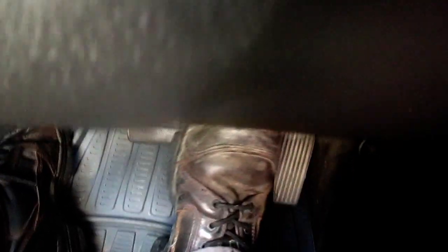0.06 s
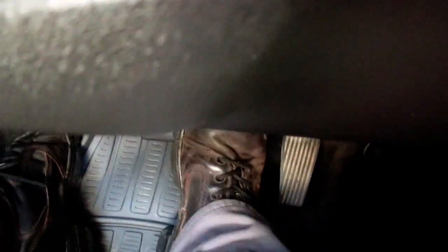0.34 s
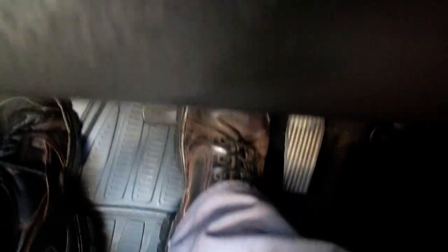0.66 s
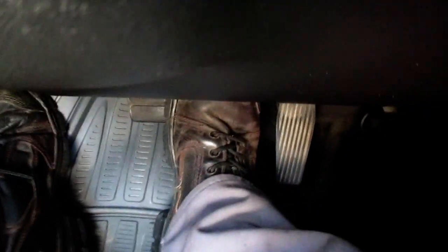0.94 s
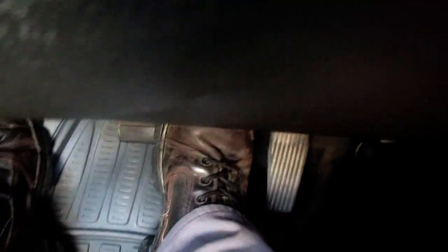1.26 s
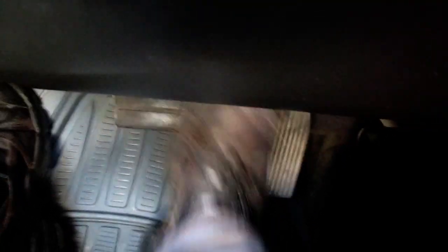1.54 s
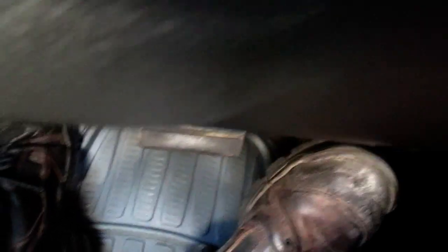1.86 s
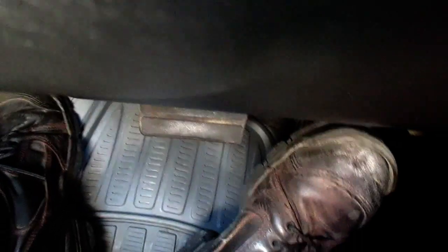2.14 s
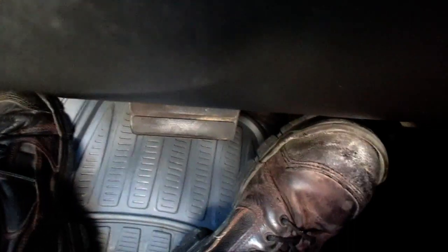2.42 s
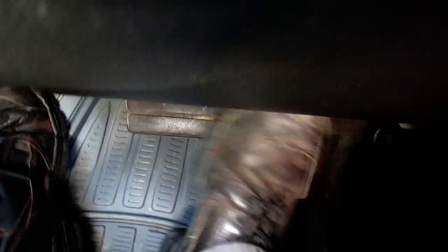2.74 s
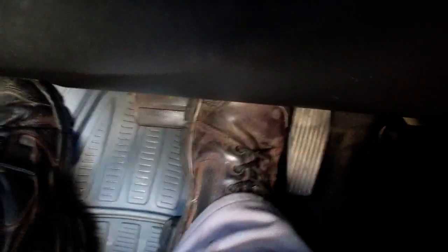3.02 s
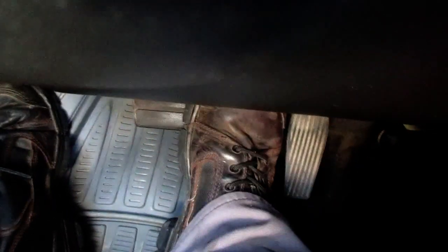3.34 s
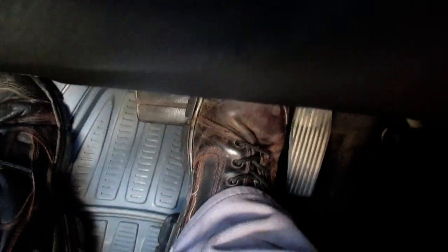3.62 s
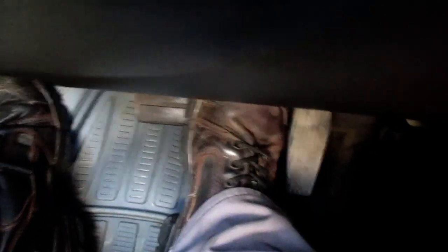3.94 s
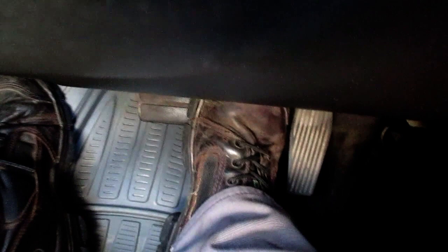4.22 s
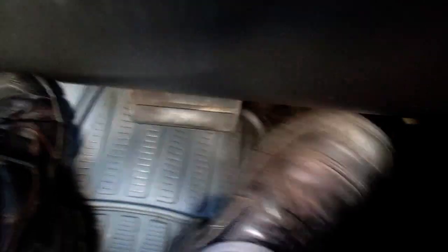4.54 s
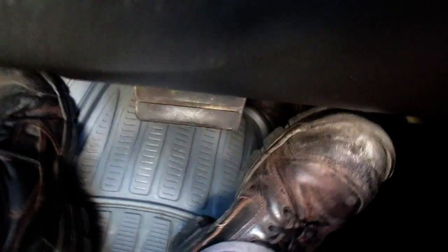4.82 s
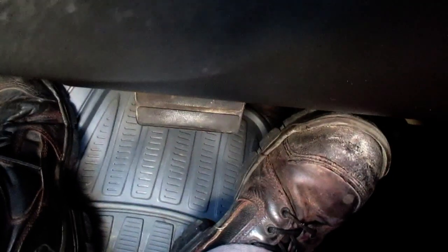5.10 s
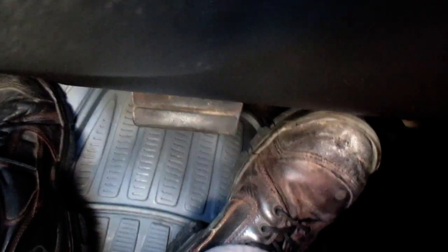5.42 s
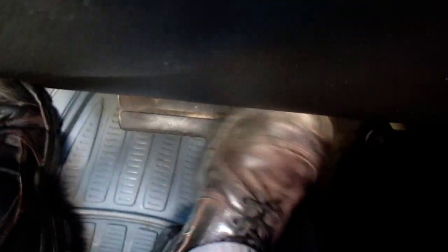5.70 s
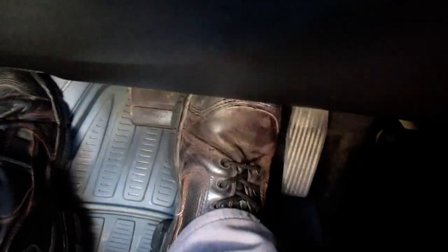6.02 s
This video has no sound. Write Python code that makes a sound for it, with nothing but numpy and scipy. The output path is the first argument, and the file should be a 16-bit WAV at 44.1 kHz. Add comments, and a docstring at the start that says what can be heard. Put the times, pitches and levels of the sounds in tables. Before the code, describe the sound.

Low road rumble and a slowly sinking driveline whine fill a moving car's cabin throughout, heard from the footwell. An indicator ticks evenly, alternating thin and firmer clicks about every 0.4 seconds. A leather shoe gives tiny high squeaks around 0.3 seconds. From 0.5 to 1.6 seconds the brakes judder: loud, dull knocks, about ten a second, with a low shudder and groan, and a very faint, brief squeal near 0.7. A pedal clunks at 1.7. The sole scrapes and a trouser leg swishes softly from about 2.4 to 3.2 seconds. A second, softer judder runs from 3.3 to 4.4, with light ticks between the later knocks. The pedal clicks on release, and a clunk follows at 4.6. The shoe rubs and scrapes from 5 seconds, a lighter clunk lands near 5.75, and a last short judder comes just before the end, around 6 seconds.

```python
"""The footwell of a moving car, slowed by three presses of the brake pedal.
Broadband road roar and a sinking driveline whine, coloured by cabin resonances, form the background.
An indicator relay ticks; a shoe squeaks by stick-slip friction, its sole scrapes, a trouser leg swishes.
Under braking the pads squeal briefly, and once a wheel turn the body is shaken by the grabbing brake
and struck by a loose part, which sets its damped modes ringing."""
import sys
import numpy as np
from scipy import signal
from scipy.fft import rfft, irfft
from scipy.io import wavfile
from scipy.ndimage import uniform_filter1d

SR = 44100
rng = np.random.default_rng(int(sys.argv[2]) if len(sys.argv) > 2 else 0)


def materialize(psi):
    """Save the field psi as 16-bit PCM at rate SR to the path in sys.argv[1].

    A 1-D psi becomes a single channel; in a 2-D psi each row is a channel.
    """
    bounded = np.clip(np.atleast_2d(psi).T, -1, 1)
    quanta = np.round(bounded * 32767).astype(np.int16)
    wavfile.write(sys.argv[1], SR, quanta)


N = 271656
TIME = np.arange(N) / SR

# Spectrum of tyre noise (f/Hz, level/dB)
ROAD_SPECTRUM = [(6, -18), (22, 3), (45, 4), (92, 2.5), (125, -8.5), (190, -7.5), (290, -5), (400, -14),
                 (700, -17), (1000, -25), (1900, -34.5), (3000, -48), (4200, -58.5), (11000, -70)]
# Roughness of the road surface (t/s, rumble level/dB, roar level/dB)
ROAD_ROUGHNESS = [(0, -19, -26.5), (.6, -12.5, -24.5), (1.2, -17, -26.5), (2.25, -16, -23.5),
                  (2.7, -19, -21), (3.05, -13, -24), (4.6, -15.5, -27.5), (5.501, -16.5, -25),
                  (5.8, -12.5, -23.5), (6.16, -13.5, -24.5)]
# Driveline fundamental, proportional to road speed (t/s, f/Hz)
DRIVELINE_PITCH = [(0, 81.85), (1.55, 75.4), (3.05, 74.48), (4.6, 70.56), (6.16, 69.13)]
# Partials of the whine (harmonic number, level/dB)
WHINE_HARMONICS = [(1, -36.5), (2, -40.5), (3, -35.5), (4, -33), (5, -42), (6, -38), (7, -44.5), (8, -42.5),
                   (9, -44.5), (10, -45), (11, -38), (12, -64.5), (13, -51), (15, -61), (16, -52.5),
                   (21, -57), (23, -60), (25, -59.5)]
# Partials altered as braking shifts the load on the gears (harmonic number, change/dB)
LOAD_CHANGES = [(3, -2.5), (7, 7), (11, -3)]
# Cabin resonances (f/Hz, bandwidth/Hz, lift/dB)
CABIN_MODES = [(156.9, 11.8, 15.5), (222.9, 8.7, 9.5), (278.7, 7.1, 9.5), (295, 12, 3), (450.4, 30, 6),
               (510.6, 26, 9.5), (600, 9.9, 5.5), (747, 17, 8), (1469, 36, 9), (1600, 22, 9),
               (1745, 30, 10.5)]
# Spectrum of a small, hard impact (f/Hz, level/dB)
TICK_SPECTRUM = [(1000, -11), (3000, 6.5), (5000, -0.5), (8000, 0), (9000, -15), (11000, -13.5)]
# Modes of the relay housing (f/Hz, pull-in level/dB, release level/dB)
RELAY_MODES = [(2537, 1, -20.5), (2755, -3.5, -16), (3010, -12.5, -7), (3275, -13.5, -12),
               (3660, -21, -12.5), (6190, -14.5, -17), (6480, -18.5, -18.5), (7240, -29.5, -6),
               (9900, -35, -16.5)]
# Shoe squeaks (t/s, duration/s, first f/Hz, last f/Hz, level/dB, roughness 0-1)
SHOE_SQUEAKS = [(0.23, 0.014, 4700, 4820, -36, 0.8), (0.254, 0.021, 5040, 5000, -33.5, 0.2),
                (0.296, 0.044, 5040, 4980, -32.5, 0.2), (0.333, 0.018, 4920, 4770, -47, 0.44),
                (0.383, 0.011, 4630, 4580, -45, 0.15), (0.449, 0.021, 4630, 4680, -44.5, 0.3),
                (0.474, .012, 4650, 4550, -49, 0.5), (3.091, 0.014, 5130, 5300, -45.5, 0.55)]
# The foot shifts or changes pedal (t/s, duration/s, cloth level/dB, sole level/dB)
FOOT_MOVES = [(0.005, .18, -46, -41), (0.21, 0.084, -45, -38), (0.388, 0.056, -39.5, -68),
              (0.496, 0.021, -41, -51), (1.536, 0.2, -47.5, -34.5), (2.52, 0.16, -39, -33),
              (2.595, .12, -50, -31), (2.624, 0.68, -55, -39), (2.796, 0.13, -51.5, -34.5),
              (4.432, 0.23, -50, -35.5), (5.462, 0.36, -43, -29.5)]
# The shoe rubs to and fro on the accelerator (t/s, duration/s, first level/dB)
SHOE_SHUFFLES = [(2.37, .15, -53), (4.639, .15, -54.5), (5.012, .44, -54)]
# Spectrum of sliding cloth (f/Hz, level/dB)
CLOTH_SPECTRUM = [(300, 13.5), (1000, -4.5), (3000, 2.5), (5000, -3), (8000, -3.5), (10000, -5.5),
                  (11200, -16.5)]
# Spectrum of the scraping sole (f/Hz, level/dB)
SOLE_SPECTRUM = [(300, 3.5), (900, 4.5), (1400, -1.5), (2200, -8), (3300, -19), (6000, -39.5)]
# Brake presses (t/s, duration/s, first wheel period/s, knock level/dB, onset offset/dB,
# knock decay/(dB/s), shake level/dB, shake decay/(dB/s), tick level/dB)
BRAKE_PRESSES = [(0.4788, 1.15, 0.091, -12.5, -5, 3.5, -9.5, 9.5, -54),
                 (3.296, 1.11, .0974, -18, -11.5, 3.5, -15.5, 0, -49.5),
                 (5.85, 0.14, .107, -17.5, -12, 3, -17.5, 7, -62)]
# Envelope of the squeal at the hardest press (t/s, level/dB)
SQUEAL_ENVELOPE = [(.655, -75), (.678, -54), (.70, -69), (.72, -75)]
# Shaking of the body (harmonic of the wheel's rotation, level/dB)
SHAKE_HARMONICS = [(2, -2), (3, -3.5), (4, -6.5), (5, -19.5)]
# The pedal clicks as it is let go (t/s, level/dB)
PEDAL_RELEASES = [(4.434, -42), (6.136, -48)]
# The pedal meets its stop or the sole (t/s, level/dB)
PEDAL_CLUNKS = [(1.691, -12), (4.583, -15), (5.752, -20)]
# Modes of the struck car body (f/Hz, level/dB, T60/s)
BODY_MODES = [(82.4, -4.5, 0.26), (149.2, -3, 0.17), (258.5, -1.5, 0.1), (310, 1.5, 0.047), (458, -13, 0.1),
              (650.5, -0.5, 0.052), (868, -7, 0.015), (1083, -10, 0.035), (1510, -11.5, 0.034),
              (2117, -27, 0.11)]
# Spectrum of the clatter after a blow (f/Hz, level/dB)
CLATTER_SPECTRUM = [(60, 3), (150, -3), (290, 15), (420, -12), (650, -5), (900, -1.5), (1500, -13.5),
                    (2200, -19), (3200, -23.5), (4500, -40.5), (7500, -43), (11000, -55.5)]


def gain_of(db):
    """Amplitude ratio of a level in decibels."""
    return 10 ** (np.asarray(db) / 20)


def unit_rms(x):
    """Normalisation to an rms value of 1."""
    return x / np.sqrt(np.mean(x ** 2) + 1e-20)


def add(mix, s, sound):
    """Superposition of a sound on the mix, from time s."""
    part = mix[max(round(s * SR), 0):][:len(sound)]
    part += sound[:len(part)]


def resonance(f, centre_hz, width_hz):
    """Lorentzian resonance curve of unit height."""
    return 1 / (1 + (2 * (f - centre_hz) / width_hz) ** 2)


def colour(spectrum, hz):
    """Spectral gain, by interpolating level against log frequency."""
    f, db = np.transpose(spectrum)
    return gain_of(np.interp(np.log(hz + 1), np.log(f), db))


def noise(shape):
    """Gaussian noise filtered by the response shape(f), at unit rms."""
    return unit_rms(irfft(rfft(rng.standard_normal(N)) * shape(np.fft.rfftfreq(N, 1 / SR)), N))


def drift(hz):
    """Random fluctuation, low-passed at about hz."""
    return noise(lambda f: np.exp(-(f / hz) ** 2))


def bursts(blows, rise, hold, t60, tail_db, tail_t60):
    """Two-slope decay after each blow: brief chatter, then cabin reverberation (times in s)."""
    t, out = np.arange(SR // 4) / SR, np.zeros(N)
    direct = gain_of(-60 * np.maximum(t - hold, 0) / t60)
    tail = gain_of(tail_db - 60 * t / tail_t60)
    envelope = (1 - np.exp(-t / rise)) * np.hypot(direct, tail)
    for s, db in blows:
        add(out, s, gain_of(db) * envelope)
    return out


def braking(ease_s=.45):
    """Brake load as a smoothed gate: 1 when braking, 0 when coasting."""
    on = sum(1. * (TIME > start) * (TIME < start + length) for start, length, *_ in BRAKE_PRESSES)
    return uniform_filter1d(on, int(ease_s * SR))


def road(split_hz=140, rumble_db=-2, roar_db=1, flutter_db=0.67):
    """Random excitation of the tyres by the road: a deep body rumble and a fluttering roar."""
    s, low_db, high_db = np.transpose(ROAD_ROUGHNESS)
    rumble = noise(lambda f: colour(ROAD_SPECTRUM, f) / np.hypot(1, (f / split_hz) ** 4))
    roar = noise(lambda f: colour(ROAD_SPECTRUM, f) / np.hypot(1, (split_hz / (f + 1)) ** 4))
    rumble *= gain_of(np.interp(TIME, s, low_db) + rumble_db)
    roar *= gain_of(np.interp(TIME, s, high_db) + roar_db + flutter_db * drift(35))
    return rumble + roar


def driveline(whine_db=-.22, braked_db=-1.5, boom_db=-25, waver_db=.5, wobble_rad=.49, per_turn=7.33):
    """Forced vibration tied to road speed: tyre boom, and harmonics that swell near cabin resonances."""
    hz, brake, whine = np.interp(TIME, *np.transpose(DRIVELINE_PITCH)), braking(), np.zeros(N)
    s, _, roar_db = np.transpose(ROAD_ROUGHNESS)
    level_db = whine_db + braked_db * brake + 0.92 * np.interp(TIME, s, roar_db - roar_db.mean())
    phase = 2 * np.pi * np.cumsum(hz) / SR
    for k, db in WHINE_HARMONICS:
        lift_db = sum(peak * resonance(k * hz, f, width) for f, width, peak in CABIN_MODES)
        load_db = brake * dict(LOAD_CHANGES).get(k, 0)
        amplitude = gain_of(db + lift_db + load_db + waver_db * drift(4.5))
        whine += amplitude * np.sin(k * phase + wobble_rad * drift(5.7))
    boom = np.sin(4 * phase / per_turn + drift(1))  # fourth harmonic of the wheel's rotation
    return np.sqrt(2) * (whine * gain_of(level_db) + boom * gain_of(boom_db + waver_db * drift(6.2)))


def blinks(after_s, db, start_s=.22, period_s=.7785, braked_db=-3):
    """Periodic switching, softer under braking: one click a cycle (t/s, level/dB)."""
    times, brake = np.arange(start_s + after_s, N / SR, period_s), braking()
    # one blink lasts 19 ms longer, delaying all that follow
    return [(s + .019 * (s > 3.1), db + braked_db * brake[int(s * SR)]) for s in times]


def relay(blur_rad=0.92, chatter_hz=170, snap_db=(-16, -7)):
    """Contact bounce excites the housing's modes: a firm tock on pull-in, a thinner tick on release."""
    snap = noise(lambda f: colour(TICK_SPECTRUM, f))
    tock, tick = np.outer(gain_of(snap_db), snap)
    for hz, in_db, out_db in RELAY_MODES:
        bounce_phase = blur_rad * drift(chatter_hz)
        mode = np.sqrt(2) * np.sin(2 * np.pi * hz * TIME + bounce_phase)
        tock += gain_of(in_db) * mode
        tick += gain_of(out_db) * mode
    pull_ins, releases = blinks(after_s=.387, db=-29), blinks(after_s=0, db=-40.5)
    tock *= bursts(pull_ins, rise=.0011, hold=.0074, t60=.04, tail_db=-13, tail_t60=.051)
    tick *= bursts(releases, rise=.00052, hold=.0073, t60=.026, tail_db=-10, tail_t60=.07)
    return tock + tick


def shoe_squeaks(overtone_db=-22, scatter_hz=260, rasp_db=-7):
    """Stick-slip oscillation of leather on pedal rubber; uneven grip makes the tone scratchy."""
    out = np.zeros(N)
    rasp = gain_of(rasp_db) * noise(lambda f: resonance(f, centre_hz=5950, width_hz=400))
    for s, length, first_hz, last_hz, db, rough in SHOE_SQUEAKS:
        n = int(length * SR)
        hz = np.linspace(first_hz, last_hz, n) + scatter_hz * rough * drift(900)[:n]
        phase = 2 * np.pi * np.cumsum(hz) / SR
        grip = 1 + 2 * rough * drift(550)[:n]
        tone = np.sin(phase) + gain_of(overtone_db) * np.sin(2 * phase)
        squeak = unit_rms(grip * tone) + rough ** 2 * rasp[round(s * SR):][:n]
        add(out, s, gain_of(db) * squeak * signal.windows.tukey(n, .5))
    return out


def rubs(period_s=.097, stroke_s=.064, growth_db_per_s=19.5, sole_db=10.5):
    """Reciprocating strokes of the shoe, each harder than the last; columns as in FOOT_MOVES."""
    return [(start + t, stroke_s, db + growth_db_per_s * t, db + growth_db_per_s * t + sole_db)
            for start, length, db in SHOE_SHUFFLES for t in np.arange(0, length, period_s)]


def foot_swishes(grain_db=2.96, uneven_db=2, grit_db=3):
    """Sliding friction makes modulated noise: the cloth hisses and the sole scrapes."""
    cloth, sole = np.zeros((2, N))
    for s, length, cloth_db, sole_db in FOOT_MOVES + rubs():
        progress = np.linspace(0, 1, int(length * SR))
        stroke = abs(np.sin(np.pi * progress ** 0.8)) ** 0.94  # swells, then fades more slowly
        add(cloth, s, gain_of(cloth_db) * stroke)
        add(sole, s, gain_of(sole_db) * stroke)
    hiss = noise(lambda f: colour(CLOTH_SPECTRUM, f))
    hiss *= gain_of(grain_db * drift(120) + uneven_db * drift(25))
    scrape = noise(lambda f: colour(SOLE_SPECTRUM, f)) * gain_of(grit_db * drift(200))
    return cloth * hiss + sole * scrape


def brake_squeal(hz=5009):
    """Friction of the pads excites one high mode of the brake disc."""
    level_db = np.interp(TIME, *np.transpose(SQUEAL_ENVELOPE), left=-np.inf, right=-np.inf)
    return gain_of(level_db) * np.sin(2 * np.pi * hz * TIME + drift(30))


def wheel_turns(bite_s=.05, period_growth_s=.00063):
    """Deceleration lengthens each braked turn: (t/s, period/s, knock level/dB, shake level/dB)."""
    turns = []
    for start, length, period, knock_db, onset_db, knock_fade, shake_db, shake_fade, _ in BRAKE_PRESSES:
        t = 0
        while t < length:
            bite_db = onset_db * np.exp(-t / bite_s)  # the pads bite, then the foot eases off
            turns.append((start + t, period, knock_db + bite_db - knock_fade * t,
                          shake_db + bite_db - shake_fade * t))
            t, period = t + period, period + period_growth_s
    return turns


def light_ticks(after_s=.49, lag_turns=.6):
    """Light impacts as noise bursts: between the knocks late in a press, and on pedal release."""
    ticks = [(s + lag_turns * period, db)
             for start, length, *_, db in BRAKE_PRESSES for s, period, *_ in wheel_turns()
             if start + after_s < s + period / 2 and s + period < start + length]
    envelope = bursts(ticks + PEDAL_RELEASES, rise=.00074, hold=.0028, t60=.039, tail_db=-19, tail_t60=.08)
    return envelope * noise(lambda f: colour(TICK_SPECTRUM, f))


def judder(lead_s=.024, uneven_db=1, groan_db=-6, groan_s=.082):
    """Periodic forcing: once a turn the pads grab the disc's high spot, rock the body and groan."""
    shake, rub = np.zeros((2, N))
    for s, period, _, db in wheel_turns():
        t = np.arange(-period, period, 1 / SR)
        rock = sum(gain_of(level + uneven_db * rng.standard_normal()) * np.cos(2 * np.pi * k * t / period)
                   for k, level in SHAKE_HARMONICS)
        add(shake, s - lead_s - period, -gain_of(db) * rock * np.hanning(len(t)))
        add(rub, s - lead_s, gain_of(db) * np.hanning(int(groan_s * SR)))
    groan = gain_of(groan_db) * noise(lambda f: resonance(f, centre_hz=270, width_hz=170))
    return shake + rub * groan


def knocks(scatter_db=.6, rebound_db=-7, clatter_db=-4, hard_db=-9, dulling=0.14, pivot_hz=400):
    """Impacts excite damped body modes: a loose part, or the pedal, strikes, rebounds and clatters."""
    t, out = np.arange(SR // 4) / SR, np.zeros(N)
    blows = [(s, db + scatter_db * rng.standard_normal()) for s, _, db, _ in wheel_turns()] + PEDAL_CLUNKS
    for s, db in blows:
        rebound_s = .0115 * rng.uniform(0.719, 1.5)
        for delay, blow_db in (0, db), (rebound_s, db + rebound_db):
            for k, (hz, level, t60) in enumerate(BODY_MODES):
                tilt_db = dulling * (db - hard_db) * np.log2(hz / pivot_hz)  # softer blows are duller
                mode = (-1) ** k * np.sin(2 * np.pi * hz * rng.uniform(0.96, 1.03) * t)
                start_db = blow_db + level + tilt_db + rng.standard_normal()
                add(out, s + delay, gain_of(start_db - 60 * t / t60) * mode)
    clatter = noise(lambda f: colour(CLATTER_SPECTRUM, f)) * gain_of(clatter_db + 2 * drift(400))
    return out + clatter * bursts(blows, rise=.0011, hold=.0082, t60=.026, tail_db=-16, tail_t60=.08)


def scene():
    """Superposition of all sources under the steering column, in one channel."""
    background = road() + driveline()
    brakes = judder() + knocks() + light_ticks() + brake_squeal()
    return (background + brakes + relay() + shoe_squeaks() + foot_swishes())[None]


def record(dry, knee=.6, headroom=.33, cutoff_hz=11170):
    """Soft saturation rounds the tallest peaks; the ends are tapered and a low-pass limits the band."""
    excess = np.maximum(abs(dry) - knee, 0)
    rounded = dry - np.sign(dry) * (excess - headroom * np.tanh(excess / headroom))
    tapered = rounded * signal.windows.tukey(N, .001)
    low_pass = signal.firwin(1023, cutoff_hz, window=("kaiser", 9), fs=SR)
    return signal.oaconvolve(tapered, low_pass[None], "same")


dry = scene()
out = record(dry)
materialize(out)
```